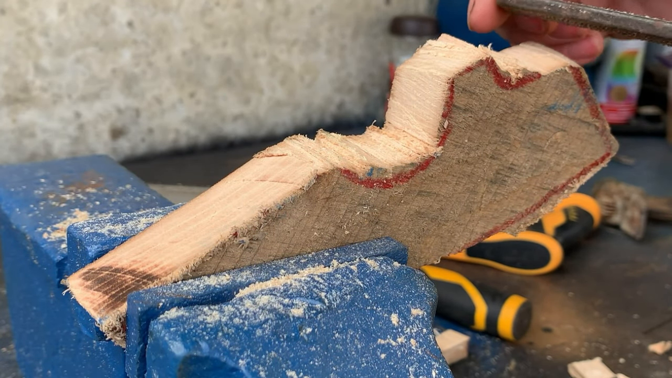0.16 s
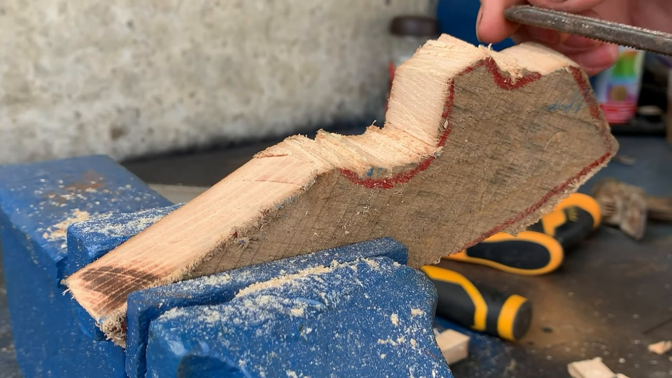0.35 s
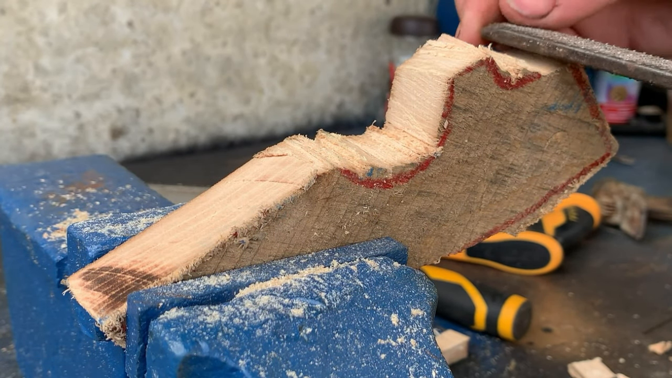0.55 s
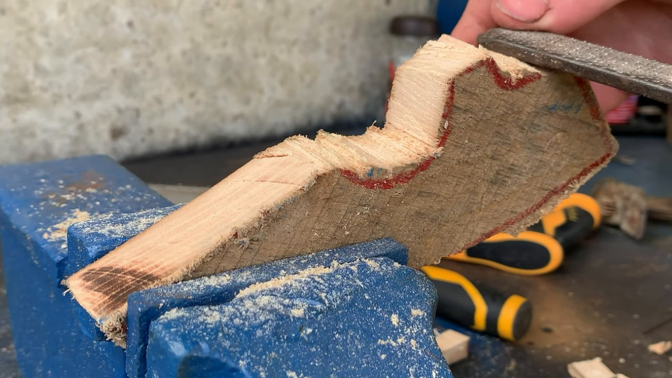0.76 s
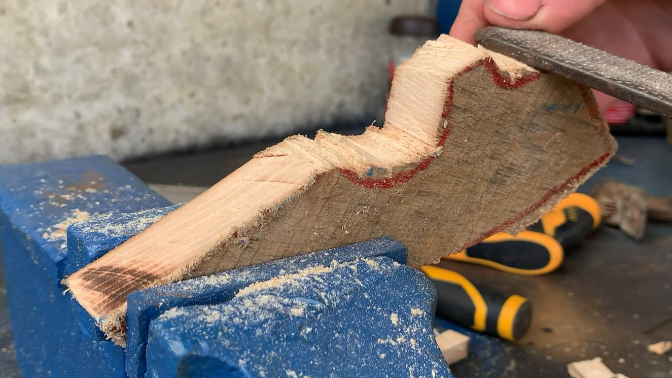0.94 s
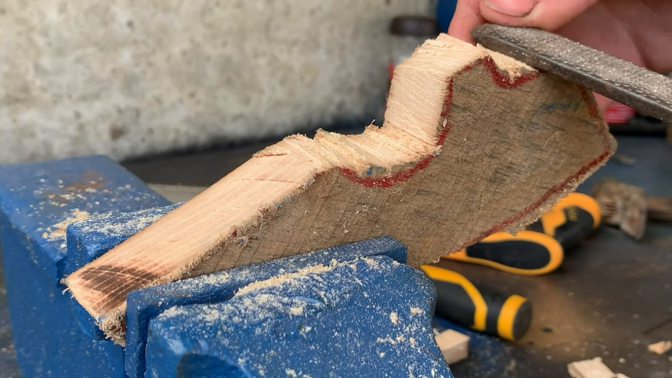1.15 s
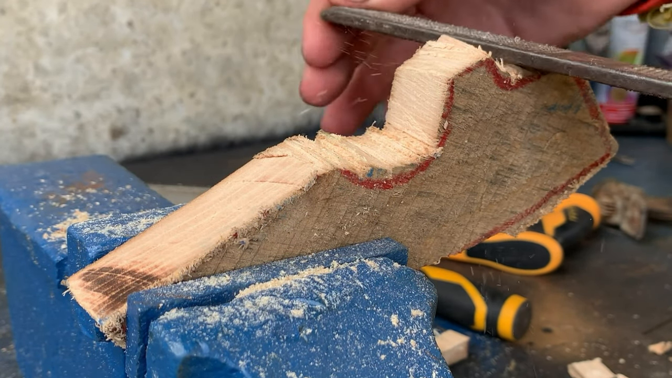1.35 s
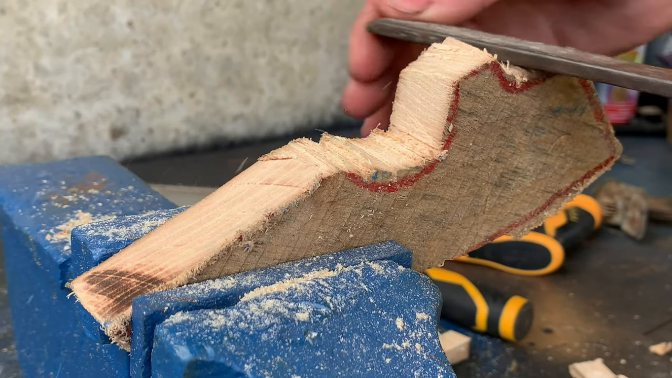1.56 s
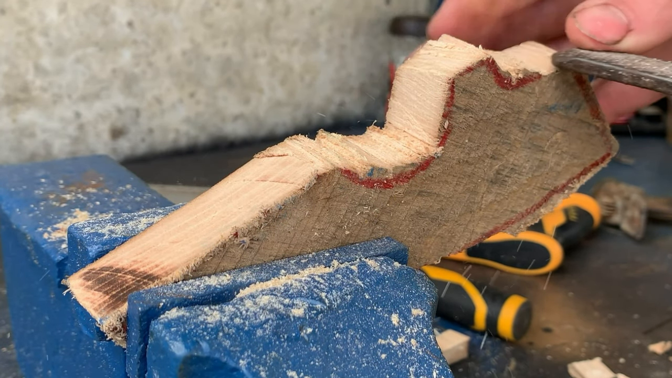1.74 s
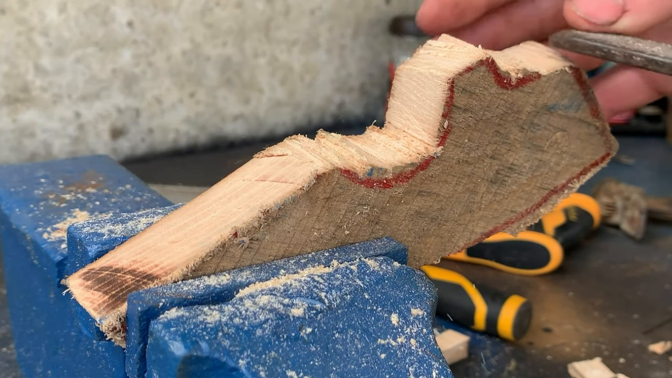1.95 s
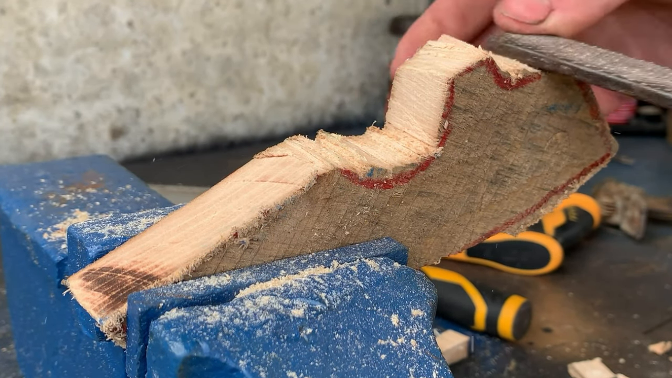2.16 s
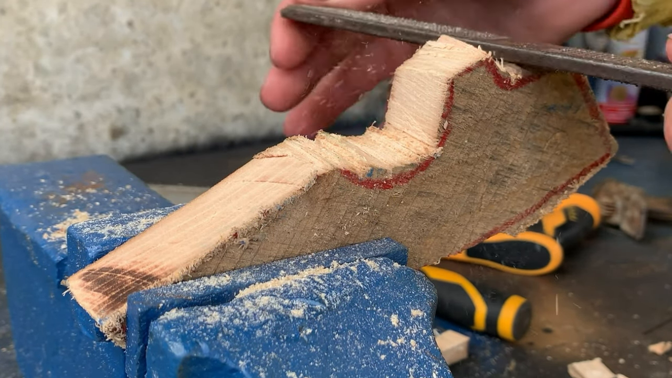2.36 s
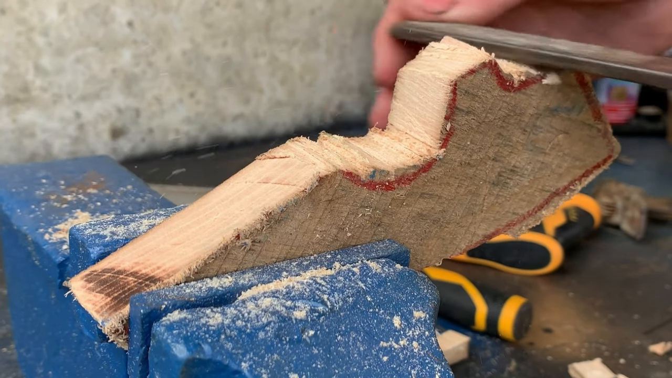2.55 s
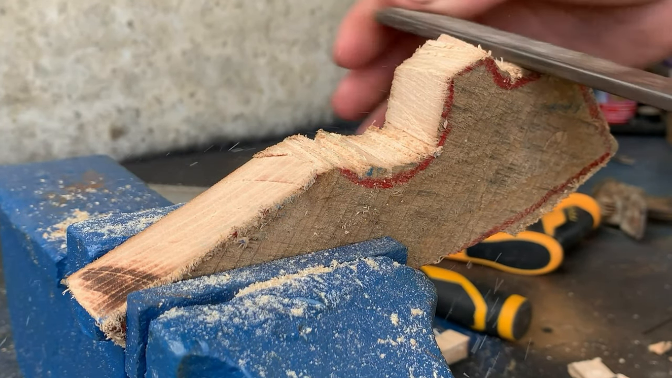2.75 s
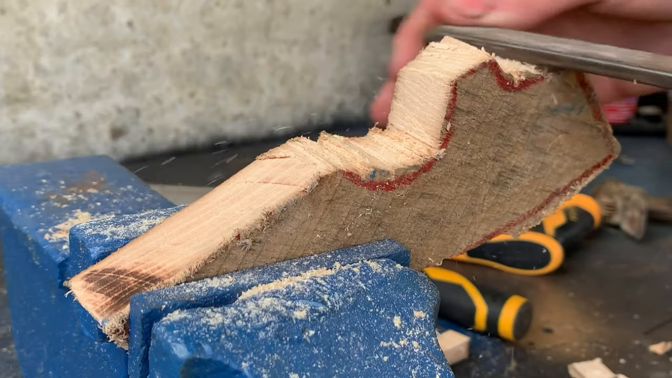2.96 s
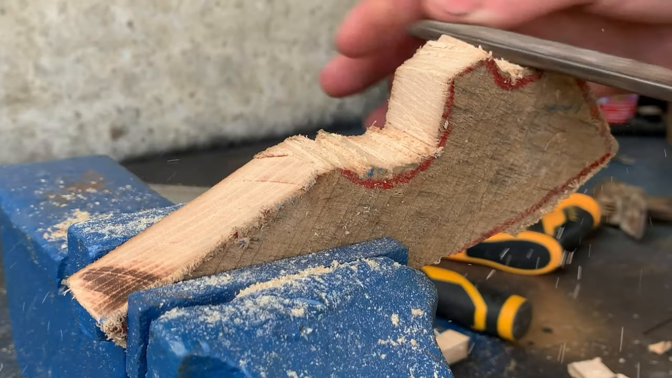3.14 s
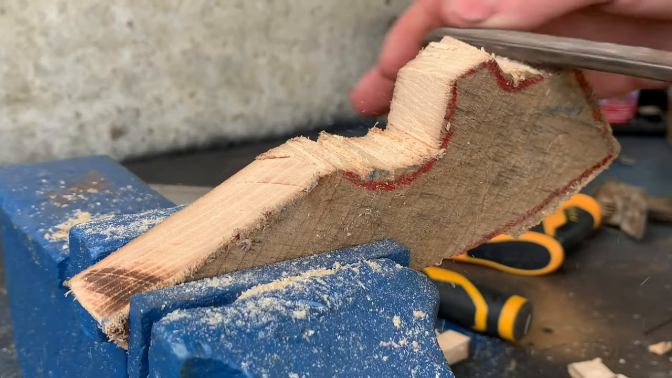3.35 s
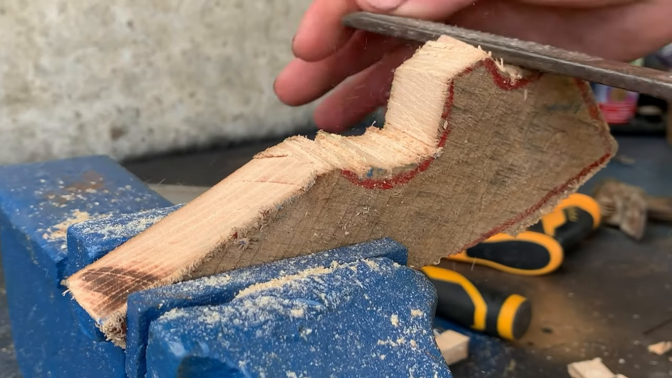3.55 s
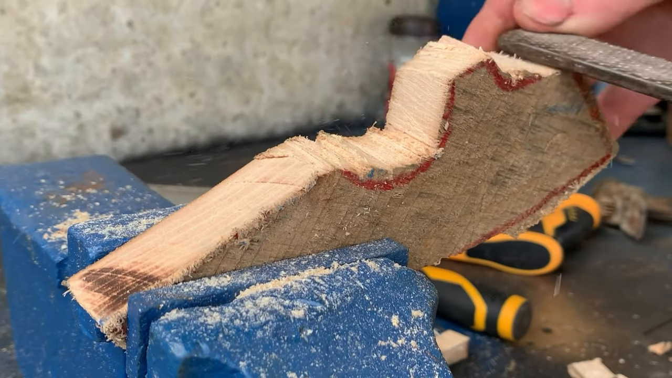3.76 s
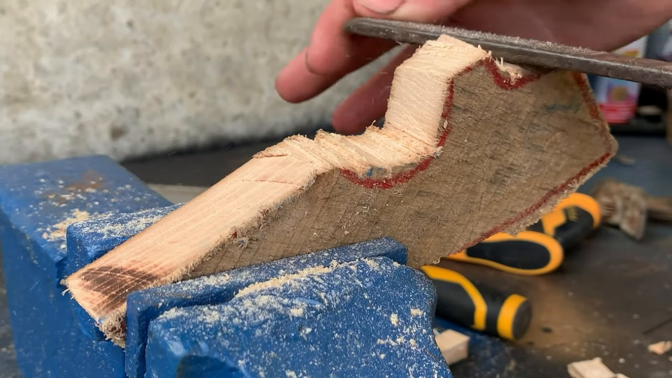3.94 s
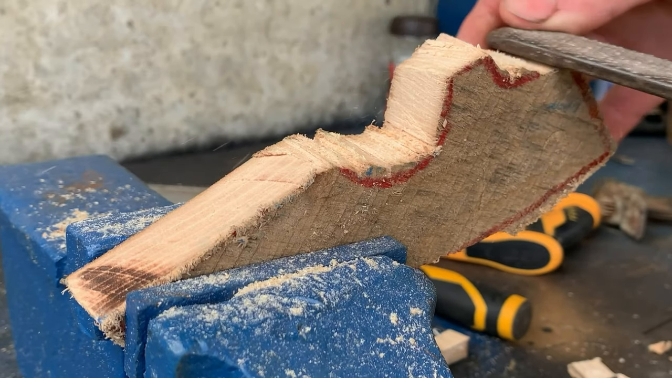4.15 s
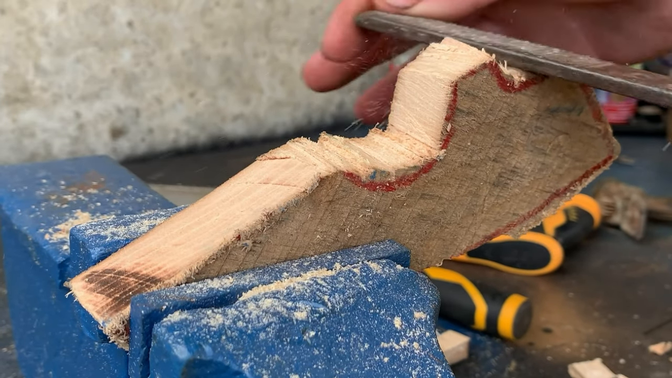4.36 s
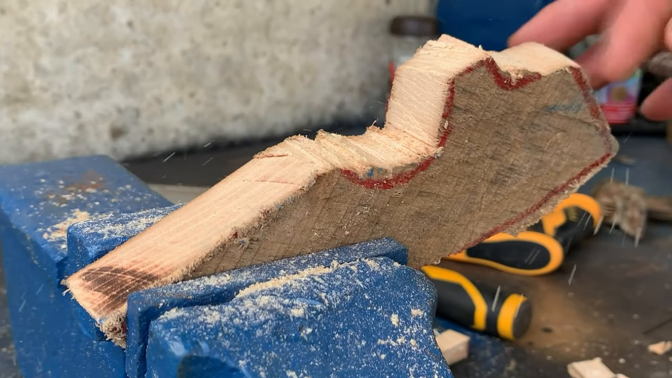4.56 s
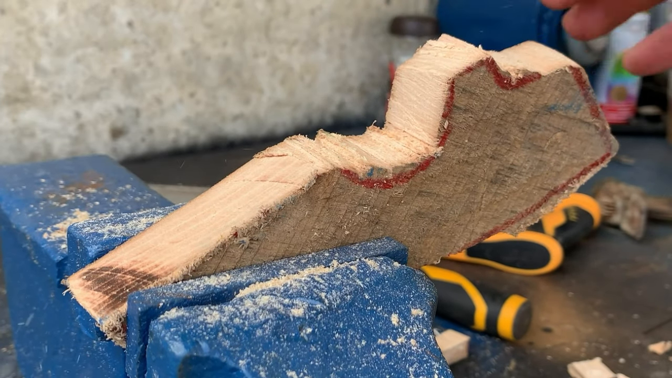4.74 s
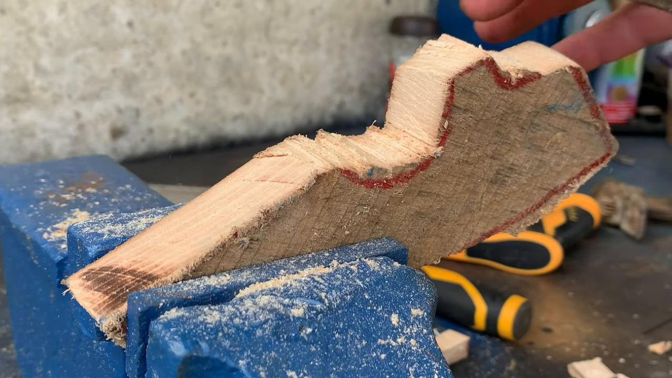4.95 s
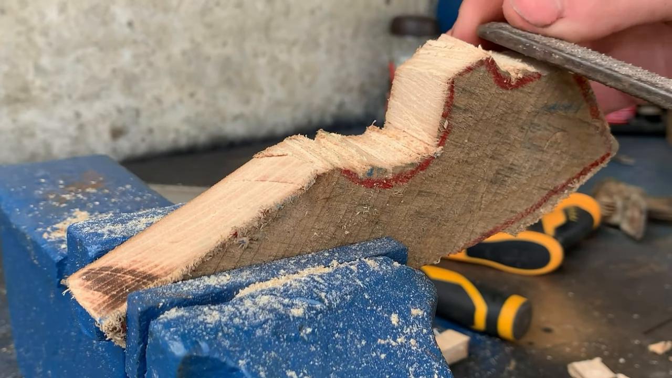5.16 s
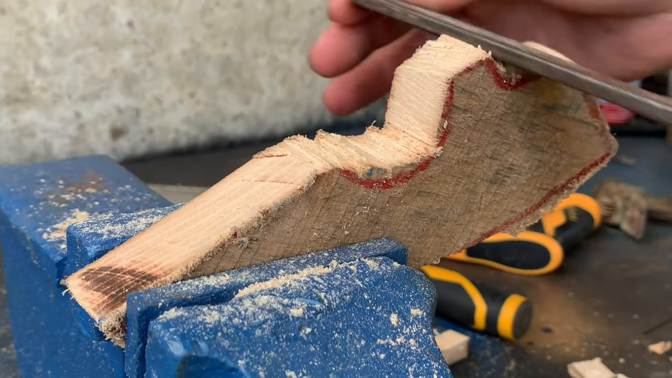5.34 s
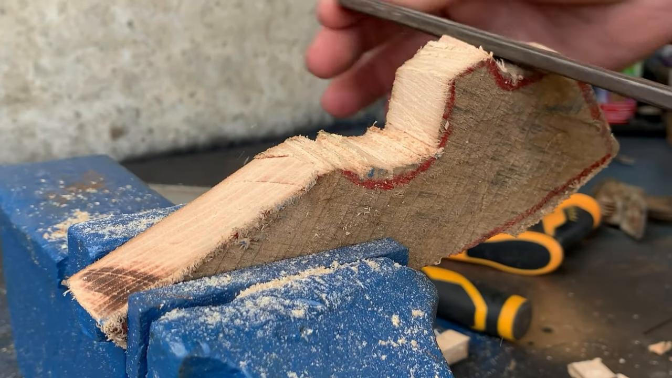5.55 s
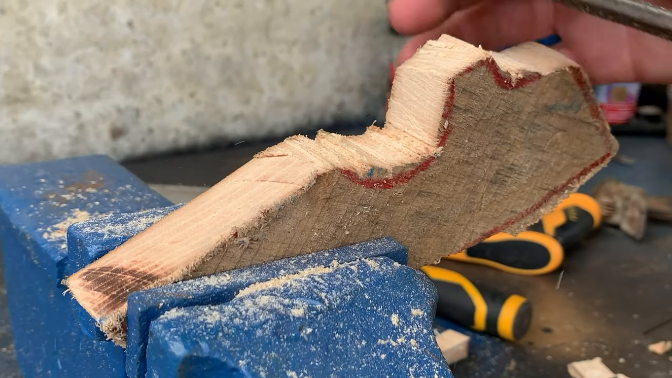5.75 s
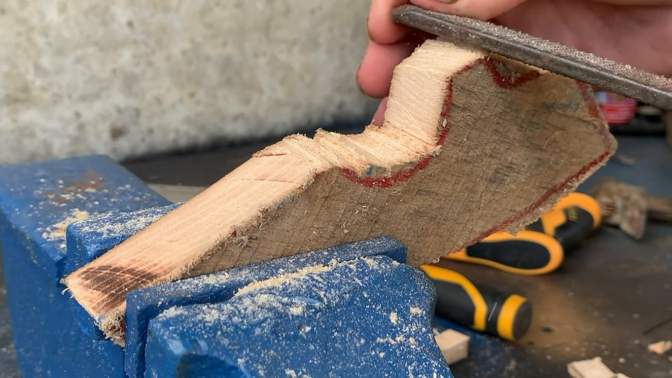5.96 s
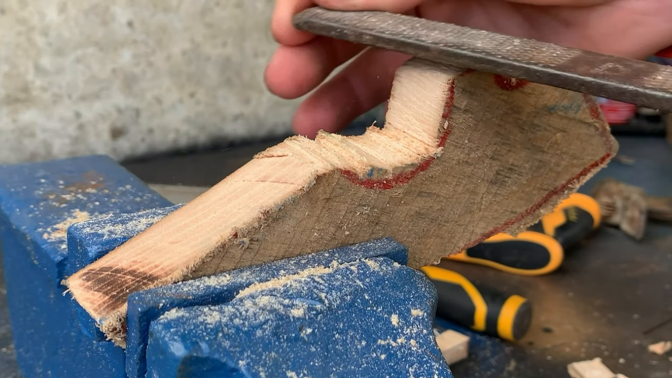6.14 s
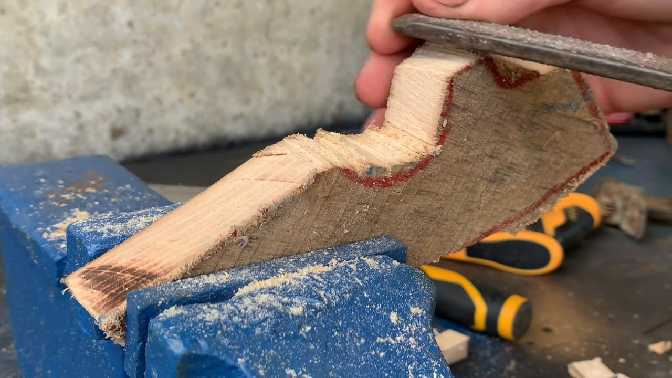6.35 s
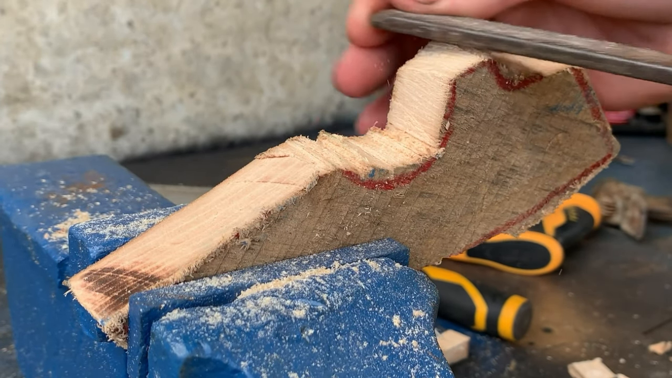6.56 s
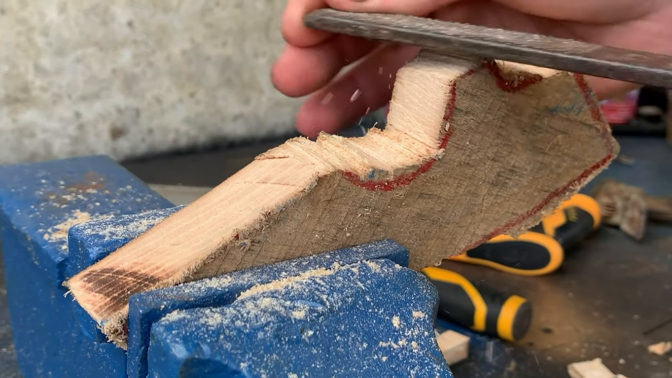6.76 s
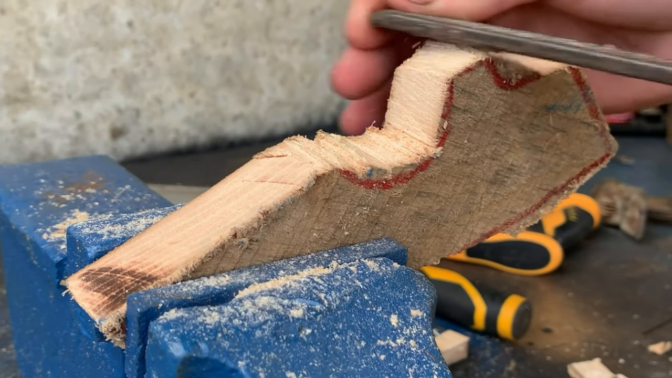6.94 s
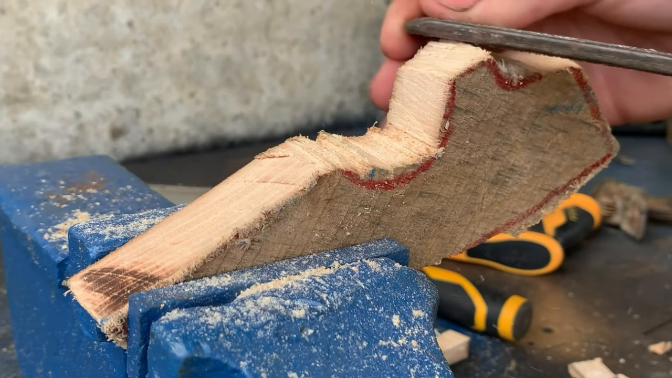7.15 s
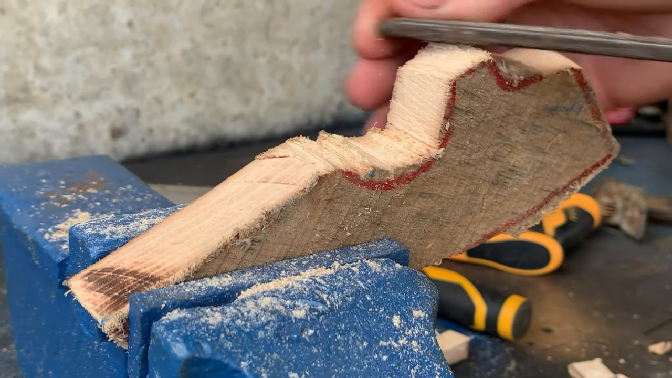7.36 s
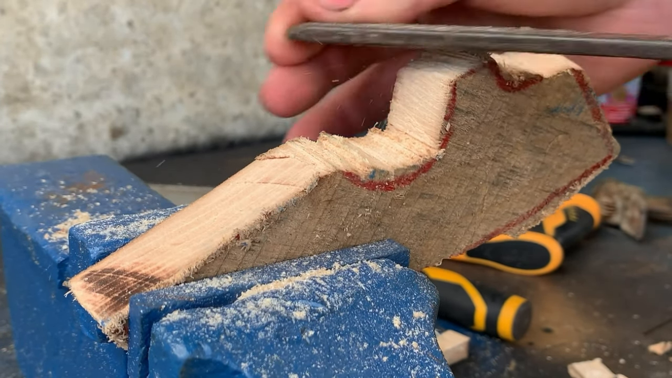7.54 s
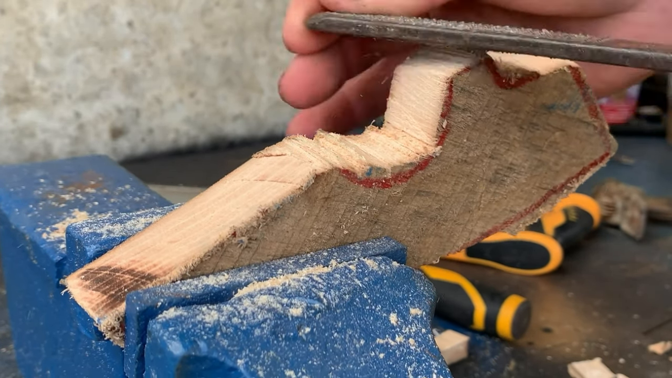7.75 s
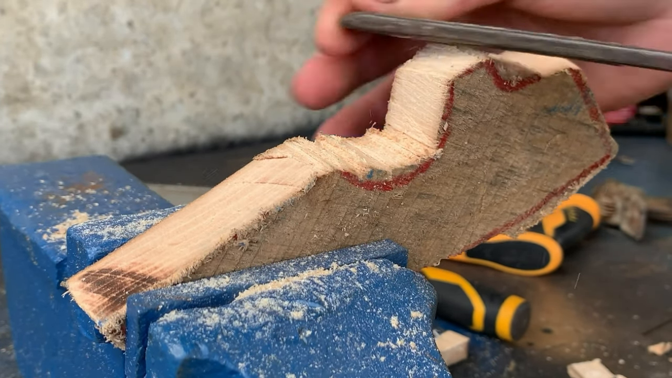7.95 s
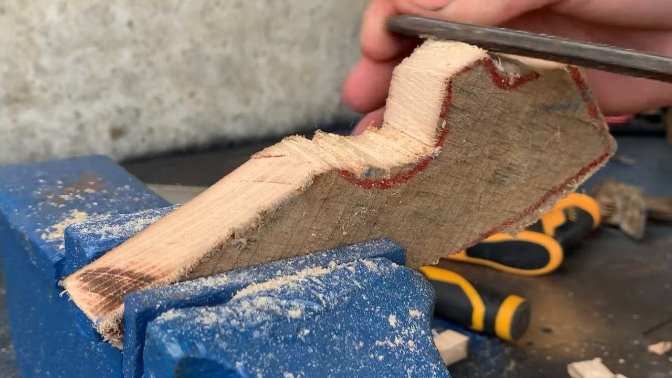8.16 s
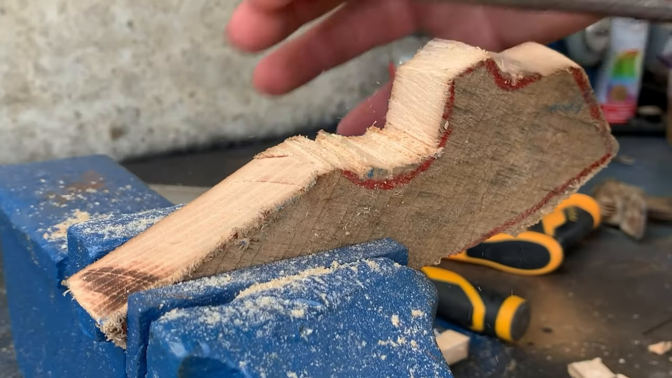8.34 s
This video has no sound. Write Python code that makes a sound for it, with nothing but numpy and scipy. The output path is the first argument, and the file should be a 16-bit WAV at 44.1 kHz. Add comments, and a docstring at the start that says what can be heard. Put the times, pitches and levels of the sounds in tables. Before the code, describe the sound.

A coarse hand file rasps back and forth over wood clamped in a vise, with a few knocks, in a quiet workshop.

```python
"""A quiet workshop, a stereo microphone close to the bench vise, the work a little to its left.
A coarse hand file rasps back and forth over a clamped wooden blank. Its teeth tear fibres (hiss), catch
and ring the blank and the file (bite), and chatter at a wavering pitch, higher on the push than on the
pull; vise and bench shake below. Between bouts the file slides lightly, is set down or bumps the vise.
Behind it lie a low rumble, a few faint far whines and short reflections from bench top and walls."""
import sys
import numpy as np
from scipy import signal
from scipy.fft import rfft, irfft
from scipy.io import wavfile
from scipy.ndimage import uniform_filter1d

SR = 44100
rng = np.random.default_rng(int(sys.argv[2]) if len(sys.argv) > 2 else 0)


def pcm_store(signal):
    """Save signal as 16-bit PCM."""
    levels = np.round(np.clip(np.atleast_2d(signal), -1, 1) * 32767)
    wavfile.write(sys.argv[1], SR, levels.astype(np.int16).T)


N = 370440

# Modes of blank and file together, of the vise, of the bench and of the file's own steel.
# Each row: pitch in Hz, level in dB, t60 in seconds.
BODY_MODES = [(483.5, 7, 0.084), (612, 5, 0.11), (688, 3, 0.08), (775, 6, 0.06), (928, 5, 0.06),
              (1026, 5, 0.06), (1238, 10, 0.04), (1405, 9, 0.035), (1475, 4, .05), (1706, 9, 0.035),
              (1900, 7, 0.012), (2170, 9, 0.04), (2330, 20, 0.018), (2620, 4, 0.016)]
VISE_MODES = [(174.7, 0.5, 0.077), (242.9, 4, 0.12)]
BENCH_MODES = [(82.2, -0.5, 0.13), (114.4, 4, 0.048)]
STEEL_MODES = [(4410, 0, 0.02), (4630, -3, 0.014)]

# How a layer swells and dies: dB down at the start, bend of the rise, dB down at the end, bend of the fall.
HISS_ARCH, BITE_ARCH = (7.65, 2.8, 12, 3.4), (10.2, 2.63, 13.3, 3.6)
BRUSH_ARCH, SCUFF_ARCH = (9.4, 1.6, 10.8, 1.9), (22.4, 0.9, 10.5, 1.3)
VISE_ARCH, BENCH_ARCH = (16.2, 1.38, 8.06, 1.52), (2.9, 2.02, 6.1, 0.9)
CHATTER_ARCH, GROAN_ARCH = (7.8, 2.34, 10, 1.4), (8.8, 5.5, 8, 2.1)
PUSH_HZ = 420.4  # chatter pitch of a push


def gain_of(db):
    """Decibels to gain."""
    return 10 ** (np.asarray(db) / 20)


def unit_rms(x):
    """Scales to rms 1."""
    return x / np.sqrt(np.mean(x ** 2) + 1e-20)


def curve_at(points, hz):
    """A spectrum table read on a log frequency axis."""
    f, value = np.transpose(points)
    return np.interp(np.log(hz + 1), np.log(f + 1), value)


def colour(x, points):
    """Filters by a spectrum table of (Hz, dB) points."""
    return irfft(rfft(x) * gain_of(curve_at(points, np.fft.rfftfreq(N, 1 / SR))), N)


def ring(x, hz, db, t60):
    """One mode struck by x."""
    r, turn = gain_of(-60 / (t60 * SR)), 2 * np.pi * hz / SR
    return signal.lfilter([gain_of(db) * np.sin(turn)], [1, -2 * r * np.cos(turn), r ** 2], x)


def ring_modes(x, modes):
    """A set of modes struck by x, at rms 1."""
    return unit_rms(sum(ring(x, *mode) for mode in modes))


def moving_ring(x, hz, db, t60):
    """One mode struck by x, its pitch following the curve hz."""
    r, turn = gain_of(-60 / (t60 * SR)), np.exp(2j * np.pi * np.cumsum(hz) / SR)
    return gain_of(db) * (turn * signal.lfilter([1], [1, -r], x / turn)).imag


def grit(per_s, spread_db):
    """Random clicks of either sign, most small, a few large."""
    size = gain_of(spread_db * np.minimum(rng.exponential(1, N), 5))
    return unit_rms(size * rng.standard_normal(N) * (rng.random(N) < per_s / SR))


def swells(crest, rise, fall, db, arch):
    """Gain curve of a row of swells: each climbs to its crest and falls away along one arch."""
    t = np.arange(0, N + 32, 32) / SR
    before, after = (np.maximum(d, 0) for d in (crest - t[:, None], t[:, None] - crest))
    rise_db, rise_bend, fall_db, fall_bend = arch
    down_db = rise_db * (before / np.maximum(rise, .004)) ** rise_bend
    down_db += fall_db * (after / np.maximum(fall, .004)) ** fall_bend
    return np.interp(np.arange(N) / SR, t, gain_of(np.max(db - down_db, axis=1)))


def patchy(x, spread_db, bins):
    """Teeth catch unevenly: random patches of pitch and time swell and fade."""
    z = signal.stft(x, nperseg=256)[2]
    patches = uniform_filter1d(rng.standard_normal(z.shape[::-1]).T, size=bins, axis=0)
    patches = unit_rms(uniform_filter1d(patches, size=7, axis=1))
    return unit_rms(signal.istft(z * gain_of(spread_db * patches), nperseg=256)[1][:N])


def wandering_tone(hz, steady, width_hz):
    """A complex tone of rms 1 whose phase and size wander; steady = 1 holds the size still."""
    r = np.exp(-np.pi * width_hz / SR)
    noise = rng.standard_normal(N) + 1j * rng.standard_normal(N)
    wander = signal.lfilter([1], [1, -2 * r, r ** 2], noise)
    wander = wander / abs(wander) * unit_rms(abs(wander) ** (1 - steady))
    return wander * np.exp(2j * np.pi * np.cumsum(hz) / SR)


def room_tone():
    """Low rumble and faint hiss of the workshop; the bass is mostly common to both channels."""
    # The still room. Each row: frequency in Hz, level in dB.
    spectrum = [(15, -33), (25, -1), (64, 8.5), (242, -19.5), (516, -27), (863, -36.5), (1160, -33),
                (1890, -46), (3430, -45.5), (7920, -58), (16000, -51)]
    shared, left, right = rng.standard_normal((3, N))
    both = [colour(shared + colour(own, [(100, -8.5), (600, 10.5)]), spectrum) for own in (left, right)]
    return gain_of(-50.5) * unit_rms(np.array(both))


def far_whines():
    """Thin wavering tones that swell and fade far off, in a different phase on each channel."""
    # Each row: start and length in seconds, pitch in Hz, level in dB.
    whines = [(.14, .17, 1505, -70), (.68, .3, 1316, -70), (.88, .3, 1145, -69), (1.07, .12, 826, -61),
              (4.1, 1.6, 3450, -74), (5.72, .12, 850, -66)]
    t, out = np.arange(N) / SR, np.zeros((2, N))
    for start, length, hz, db in whines:
        swell = np.sin(np.pi * np.clip((t - start) / length, 0, 1)) ** .5
        waver_hz = 21 * unit_rms(uniform_filter1d(rng.standard_normal(N), size=800))
        flicker_db = 4 * unit_rms(uniform_filter1d(rng.standard_normal(N), size=1500))
        cycles = hz * t + np.cumsum(waver_hz) / SR + rng.random((2, 1))
        out += gain_of(db + flicker_db) * swell * np.sin(2 * np.pi * cycles)
    return out


def reflections(x, t60, after_s):
    """Reflections that change as hands and file move: three stereo tails take turns."""
    t, turn = np.arange(SR // 4) / SR, np.pi * 1.7 * np.arange(N) / SR
    out = np.zeros((2, N))
    for k in range(3):
        tail = rng.standard_normal((2, len(t))) * gain_of(-60 * t / t60) * (t > after_s)
        tail = signal.lfilter([1], [1, -.3], tail)
        feed = x * np.sqrt(2 / 3) * np.cos(turn + k * np.pi / 3)
        out += signal.fftconvolve(feed[None], tail / np.linalg.norm(tail[0]), axes=1)[:, :N]
    return out


def bench_shake(vise_gain, bench_gain):
    """Uneven pushes ring the low modes of vise and bench under each stroke."""
    jolts, heaves = grit(600, 2.0), grit(300, 1.7)
    shake = ring_modes(jolts, VISE_MODES) * vise_gain + ring_modes(heaves, BENCH_MODES) * bench_gain
    return colour(shake, [(30, -26), (60, -0.5)])  # the shaking carries no deep bass


def knocks(landing_s=0.00051, settle_s=0.013, focus_db_per_octave=5):
    """The file is set down or bumps the vise: a blow cracks and rings, then the bench booms."""
    # Each row: time in seconds, peak of the ring in dB, crack in dB, softness and scuff time in ms,
    # best struck pitch in Hz, bench boom and after-ring in dB. Crack, boom and after-ring are
    # relative to the ring.
    blows = [(0.347, -61, -40, 0.34, 6.1, 200, 23, -30), (0.536, -37, -44, 0.16, 9.2, 900, -11, -2.5),
             (0.983, -40.5, -21, 0.038, 2.7, 246, 0, -20), (1.189, -27, -23, 0.19, 11, 500, -19, -17),
             (2.0384, -13, -24, 0.025, 3.1, 1400, -25, -21), (4.68, -39.5, -66, 3.1, 12, 170, -3.5, -26),
             (4.787, -45.5, -57, 3.1, 12, 170, -2, -34), (4.935, -51, -60, 3.1, 15, 166, -14, -33),
             (5.122, -25, -33, 0.12, 2.5, 950, -13, -8.5), (5.295, -41, 11.5, 0.24, 8.6, 1384, -22, -20),
             (5.869, -25, -30, 0.07, 6, 680, -11, -3)]
    # What lingers in the wood. Each row: pitch in Hz, level in dB, t60 in seconds.
    after_modes = [(372, -10, 0.061), (529, -3, 0.034), (605, -8.5, 0.029)]
    out, t = np.zeros(N + SR), np.arange(SR // 4) / SR
    modes = BODY_MODES + VISE_MODES
    settle = t / settle_s * np.exp(-t / settle_s)
    for start, db, crack_db, soft_ms, scuff_ms, best_hz, boom_db, after_db in blows:
        blow = rng.standard_normal(len(t)) * np.exp(-1000 * t / scuff_ms) * np.minimum(t / landing_s, 1)
        thud = signal.lfilter([1], [1, -np.exp(-1000 / (SR * soft_ms))], blow)
        octaves_off = abs(np.log2(np.transpose(modes)[0] / best_hz))
        spot_db = 2 * rng.standard_normal(len(modes)) - focus_db_per_octave * octaves_off
        # the resting file damps the upper modes most
        rung = sum(ring(thud, hz, level + spot, t60 * (450 / hz) ** 0.31)
                   for (hz, level, t60), spot in zip(modes, spot_db))
        # a small contact gives no low thump
        rung = signal.lfilter(*signal.butter(2, 0.4 * best_hz, "high", fs=SR), rung)
        after = sum(ring(settle * rng.standard_normal(len(t)), *mode) for mode in after_modes)
        boom = sum(ring(settle ** 2 * (1 + rng.standard_normal(len(t))), *mode) for mode in BENCH_MODES)
        crack = rng.standard_normal(len(t)) * np.exp(-t / 0.004)
        knock = (rung / abs(rung).max() + gain_of(after_db) * after / abs(after).max()
                 + gain_of(crack_db) * crack + gain_of(boom_db) * boom / abs(boom).max())
        at = round(start * SR)
        out[at:at + len(t)] += gain_of(db) * knock
    return out[:N]


def tooth_squeak():
    """A tooth squeaks as the file runs off the edge: one short fuzzy whistle."""
    whistle = wandering_tone(hz=np.full(N, 5290), steady=0.67, width_hz=130).real
    return whistle * swells(crest=4.467, rise=.012, fall=.02, db=-43, arch=BRUSH_ARCH)


def light_slides(catches):
    """The file slides without pressure: light hiss, faintly ringing steel and dull scuffing."""
    # Each row: start, rise and fall in seconds, hiss and scuff levels in dB.
    glides = [(0.0, 0.025, 0.074, -60, -54), (.27, 0.25, 0.12, -60, -74), (.74, 0.1, 0.21, -65.5, -86),
              (1.37, 0.015, 0.42, -55, -70), (1.7, 0.0075, 0.089, -45, -77),
              (2.044, 0.015, 0.038, -58, -38.5), (2.135, 0.038, 0.07, -48.5, -35.5),
              (4.519, 0.0077, 0.095, -47, -59), (4.8, 0.16, 0.02, -61.5, -55),
              (5.011, 0.017, 0.047, -65, -39.5), (5.12, 0.018, 0.087, -57, -48.5),
              (5.19, 0.074, 0.031, -49.5, -46), (5.655, 0.002, 0.14, -50.5, -84),
              (5.875, 0.071, 0.13, -68, -61.5), (5.95, 0.053, 0.055, -58.5, -54.5),
              (8.3, 0.077, 0.094, -62, -57)]
    # Teeth brushing the wood. Each row: frequency in Hz, level in dB.
    brush_spectrum = [(2500, 2), (4300, -1), (6500, -5.5), (9000, -6.5), (11000, 1), (13000, 0.5),
                      (15500, 5.5)]
    start, rise, fall, hiss_db, scuff_db = np.transpose(glides)
    scuff = unit_rms(colour(catches, [(250, 4), (600, -2.5), (1300, -5.5), (2600, -14.5), (5000, -30)]))
    brush = grit(6000, 0.74)
    hiss = unit_rms(colour(brush, brush_spectrum)) + gain_of(-20.5) * ring_modes(brush, STEEL_MODES)
    return (patchy(hiss, spread_db=2.5, bins=9) * swells(start + rise, rise, fall, hiss_db, BRUSH_ARCH)
            + scuff * swells(start + rise, rise, fall, scuff_db, SCUFF_ARCH))


def groans(sag_hz_per_s=150):
    """A push locks into a steady, slightly falling tone; returns the tone and its gain curve."""
    # Each row: middle and half length in seconds, level in dB.
    locks = [(1.321, 0.021, -20.5), (2.242, 0.03, -23.5), (2.319, 0.03, -16), (2.833, 0.02, -16.5),
             (3.215, 0.019, -23), (3.558, 0.026, -18), (4.271, 0.02, -14), (6.841, 0.015, -25.5),
             (7.351, 0.007, -26), (7.632, 0.0074, -25.5), (7.876, 0.0094, -24)]
    middle, half, db = np.transpose(locks)
    t = np.arange(N) / SR
    nearest = middle[np.searchsorted((middle[1:] + middle[:-1]) / 2, t)]
    hz = PUSH_HZ - sag_hz_per_s * np.clip(t - nearest, -.05, .05)
    gain = swells(middle, half, half, db, GROAN_ARCH)
    return np.sqrt(2) * wandering_tone(hz, steady=0.94, width_hz=7.2).real * gain, gain


def hollow_ring():
    """The teeth keep the lowest modes of the clamped blank ringing."""
    # Each row: pitch in Hz, level in dB, t60 in seconds.
    blank_modes = [(381, 0, 0.097), (419.8, 5, 0.12), (470, 0.5, 0.051)]
    return unit_rms(sum(ring(grit(2500, 1.0), *mode) for mode in blank_modes))


def fibre_hiss(pressure, steel_db, edge_db):
    """Dense tiny tears hiss and ring the steel; a broad treble peak adds a rasping edge."""
    # Tearing fibres. Each row: frequency in Hz, level in dB.
    tear_spectrum = [(1500, 4.5), (3000, -9), (4000, -8), (5500, -39), (7000, -9), (8000, -4), (9500, 5.5),
                     (11500, 4.5), (12700, -2), (14000, -4.5), (15200, 6), (16000, -45)]
    tears = grit(9000, 0.9) * pressure
    steel = gain_of(steel_db) * ring_modes(tears, STEEL_MODES)
    edge = gain_of(edge_db) * unit_rms(ring(tears, hz=5650, db=0, t60=0.00088))
    return patchy(unit_rms(colour(tears, tear_spectrum)) + steel + edge, spread_db=2.5, bins=5)


def tooth_bite(catches, stroke, tilt_db, detune=.006):
    """Catching teeth ring blank and file; each stroke presses elsewhere and shifts the modes."""
    # The noise between the modes. Each row: frequency in Hz, level in dB.
    catch_spectrum = [(200, -19.5), (550, 15), (1300, 5), (2000, 3), (2800, -6), (4000, -1.5),
                      (6500, -47.5), (9000, -71)]
    octaves = np.log2(np.transpose(BODY_MODES)[0] / 1000)
    spot = gain_of(2.5 * rng.standard_normal((len(tilt_db), len(octaves))) + np.outer(tilt_db, octaves))
    spot /= np.sqrt(np.mean(spot ** 2, axis=1, keepdims=True))
    shift = 1 + detune * rng.standard_normal(spot.shape)
    rung = sum(moving_ring(catches * spot[stroke, k], hz * shift[stroke, k], db, t60)
               for k, (hz, db, t60) in enumerate(BODY_MODES))
    between = colour(catches, catch_spectrum)
    dull = uniform_filter1d(between, size=24)
    between = dull + (between - dull) * gain_of(0.33 * tilt_db)[stroke]
    return patchy(unit_rms(rung) + gain_of(-1.5) * unit_rms(between), spread_db=2.5, bins=3)


def pause_gate():
    """0 in the pauses, while the file is off the wood or at rest; otherwise 1."""
    # Each row: stop and restart in seconds.
    pauses = [(1.0, 1.184), (2.664, 2.702), (5.9, 6.042)]
    t = np.arange(N) / SR
    return uniform_filter1d(1. - sum((t > stop) & (t < restart) for stop, restart in pauses), size=350)


def filing(turn_s=0.0286):
    """Teeth hiss, bite and chatter under each stroke; returns the file and the shaking it passes on."""
    # Push and pull in turn. Each row: start, rise and fall in seconds, hiss, bite and chatter in dB,
    # chatter crest as a share of the stroke, vise and bench in dB, tilt of the bite in dB per octave.
    strokes = [(1.2, 0.093, 0.054, -38.5, -32.5, -27.5, 0.7, -34, -30.5, -6),
               (1.545, 0.06, 0.11, -41, -33.5, -25.5, 0.58, -28.5, -43, -4),
               (2.205, 0.089, 0.054, -35.5, -29, -20, 0.42, -32, -37, 0),
               (2.484, 0.092, 0.089, -41.5, -36.5, -27.5, 0.42, -24.5, -39.5, 3.5),
               (2.72, 0.089, 0.044, -37.5, -28.5, -29.5, 0.22, -27.5, -43, -3.5),
               (2.921, 0.072, 0.066, -39.5, -35, -24.5, 0.68, -27, -36.5, 6.5),
               (3.101, 0.072, 0.057, -37.5, -29, -24, 0.74, -33.5, -29, -3),
               (3.3, 0.061, 0.065, -41, -37, -20.5, 0.69, -27.5, -39.5, 7),
               (3.481, 0.083, 0.016, -38, -27, -25, 0.94, -32.5, -46, -6.5),
               (3.639, 0.069, 0.052, -44, -36.5, -29, 0.85, -29, -38, 0.5),
               (3.804, 0.056, 0.073, -41.5, -32.5, -31.5, 0.92, -34, -35, -2.5),
               (4.004, 0.058, 0.056, -43.5, -34.5, -28, 0.54, -28, -49, 0.5),
               (4.17, 0.085, 0.046, -39.5, -30, -26, 0.82, -31.5, -31, 1),
               (4.385, 0.059, 0.074, -42.5, -33.5, -26, 0.33, -25.5, -35.5, 0),
               (5.288, 0.068, 0.082, -39, -39, -34, 0.52, -35.5, -35, -2),
               (5.506, 0.076, 0.083, -45, -42, -31.5, 0.67, -32.5, -44, -1),
               (6.044, 0.067, 0.056, -40.5, -36.5, -48, 0.1, -38.5, -29.5, -30),
               (6.203, 0.061, 0.072, -41, -52, -36, 0.74, -44.5, -38, 8),
               (6.372, 0.036, 0.073, -39.5, -37, -33, 0.42, -32, -33, -6),
               (6.519, 0.037, 0.06, -42.5, -35.5, -35, 0.74, -29.5, -31.5, -10.5),
               (6.656, 0.047, 0.052, -41, -36.5, -38, 0.45, -37.5, -29.5, -10),
               (6.788, 0.047, 0.04, -40.5, -30.5, -29, 0.87, -25, -46, -9),
               (6.92, 0.043, 0.049, -38.5, -33, -38, 0.26, -36, -28.5, -29),
               (7.049, 0.043, 0.042, -39.5, -35, -33.5, 0.9, -41, -36, -9),
               (7.174, 0.023, 0.072, -38, -34.5, -56, 0.05, -39, -26.5, -7),
               (7.304, 0.064, 0.031, -38.5, -35.5, -29, 0.9, -34, -35.5, -10.5),
               (7.441, 0.032, 0.063, -38, -35, -33, 0.2, -36.5, -27, -12),
               (7.561, 0.073, 0.029, -40, -40.5, -33, 0.86, -34, -31.5, -5.5),
               (7.699, 0.036, 0.044, -40, -34.5, -40, 0.4, -36.5, -23, -18.5),
               (7.82, 0.052, 0.03, -44, -33, -29, 0.87, -28, -32.5, -11),
               (7.945, 0.033, 0.042, -40.5, -29.5, -36, 0.6, -31, -25.5, -27),
               (8.055, 0.029, 0.052, -40, -43, -32.5, 0.62, -38.5, -33, -1),
               (8.179, 0.053, 0.078, -37.5, -31.5, -42, 0.84, -36, -27, -15)]
    # The file moves from the edge to the flat top. Each row: time in seconds, chatter pitch of a pull
    # in Hz, steel ring and rasping edge in dB relative to the tearing.
    seating = [(1.2, 372.6, -11, -6.5), (4.5, 376, -14, -4), (5.3, 396, -10.5, -9),
               (6.202, 411.2, -10.5, -12), (8.3, 412.8, -12.5, -11.5)]
    start, rise, fall, hiss_db, bite_db, chatter_db, share, vise_db, bench_db, tilt_db = np.array(strokes).T
    arc = (start + rise, rise, fall)
    # the stroke under way at each sample; the hand turns the file turn_s before the next one sounds
    stroke = np.maximum(np.searchsorted(start - turn_s, np.arange(N) / SR) - 1, 0)
    seat_s, *seat = np.transpose(seating)
    pull_hz, steel_db, edge_db = (np.interp(start, seat_s, column)[stroke] for column in seat)

    # the file chatters at a wavering pitch, higher on the push than on the pull
    skip = wandering_tone(np.where(stroke % 2, pull_hz, PUSH_HZ), steady=0.27, width_hz=30).real
    pressure = 1 + 0.06 * skip  # the teeth dig in once every skip
    hiss = fibre_hiss(pressure, steel_db, edge_db) * swells(*arc, hiss_db, HISS_ARCH)
    catches = (grit(3000, 1.52) + gain_of(-11) * grit(250, 2.5)) * pressure  # many fibres, a few snags
    bite = tooth_bite(catches, stroke, tilt_db) * swells(*arc, bite_db, BITE_ARCH)

    # one burst of chatter a stroke; fainter chatter and the hollow ring last as long as the bite
    burst = swells(start + share * (rise + fall), rise=.04, fall=.034, db=chatter_db, arch=CHATTER_ARCH)
    chatter = np.sqrt(2) * skip * np.maximum(burst, swells(*arc, chatter_db - 9, BITE_ARCH))
    hollow = hollow_ring() * swells(*arc, chatter_db - 6, BITE_ARCH)
    groan, groan_gain = groans()
    takeover = 1 + groan_gain / gain_of(chatter_db - 10)[stroke]  # a groan displaces rough chatter
    teeth = hiss + bite + groan + (chatter + hollow) / takeover

    shake = bench_shake(swells(*arc, vise_db, VISE_ARCH), swells(*arc, bench_db, BENCH_ARCH))
    gate = pause_gate()
    lagging_gate = uniform_filter1d(gate, size=2400, origin=1100)
    return teeth * gate + light_slides(catches), shake * lagging_gate


def stereo_microphone(x):
    """Direct sound at the microphone's two ports: shaded on the left, slightly later on the right."""
    # Each row: frequency in Hz, left minus right in dB.
    balance = [(100, 0), (300, -2.5), (1200, 0), (3000, -4.5), (6500, -5), (9000, 0)]
    # Each row: frequency in Hz, lag of the right port in ms.
    lag_ms = [(300, .22), (700, .2), (1400, .15), (2240, .18), (3620, .135), (4400, .174), (6460, .168),
              (8400, .178), (13400, .186)]
    hz, spectrum = np.fft.rfftfreq(N, 1 / SR), rfft(x)
    shade = gain_of(curve_at(balance, hz) / 2)
    delay = np.exp(-2j * np.pi * hz * curve_at(lag_ms, hz) / 1000)
    return irfft(np.array([spectrum * shade, spectrum / shade * delay]), N)


def scene():
    """File, knocks and bench close by; vise and bench top reflect at once, the walls later."""
    file, shake = filing()
    near = file + knocks() + tooth_squeak()
    treble = colour(near, [(300, -20), (1000, 0)])  # small surfaces scatter only short waves
    scatter = gain_of(-7) * reflections(treble, t60=.04, after_s=.0005)
    walls = gain_of(-17) * reflections(near + gain_of(3) * shake, t60=.16, after_s=.006)
    return stereo_microphone(near + shake) + scatter + walls + room_tone() + far_whines()


def record(dry):
    """The recorder cuts the highest treble steeply."""
    lowpass = signal.firwin(511, cutoff=15850, window=("kaiser", 9), fs=SR)
    return signal.oaconvolve(dry, lowpass[None], "same")


dry = scene()
out = record(dry)
pcm_store(out)
```